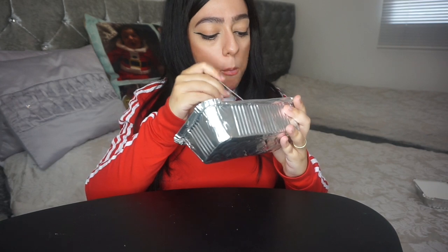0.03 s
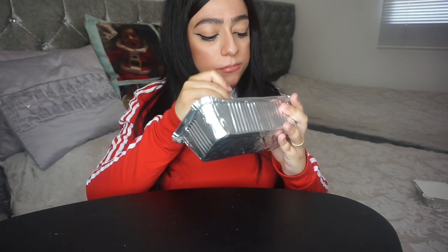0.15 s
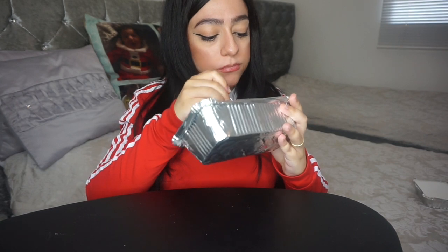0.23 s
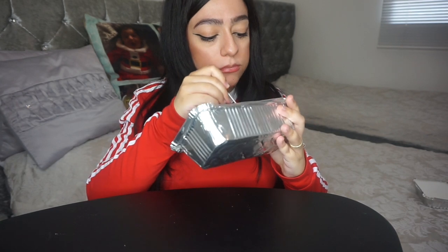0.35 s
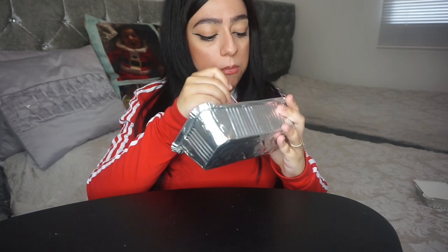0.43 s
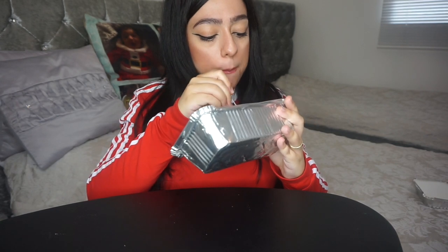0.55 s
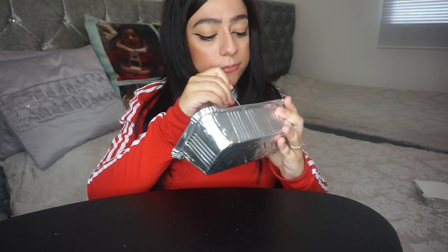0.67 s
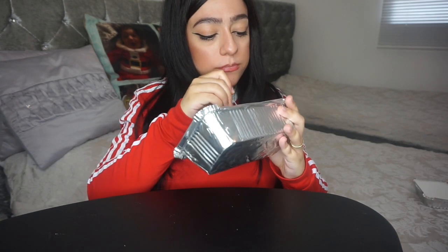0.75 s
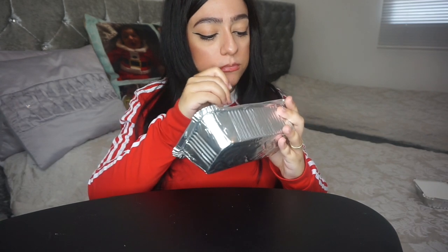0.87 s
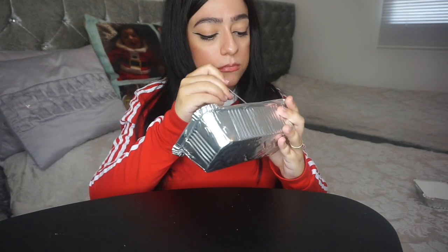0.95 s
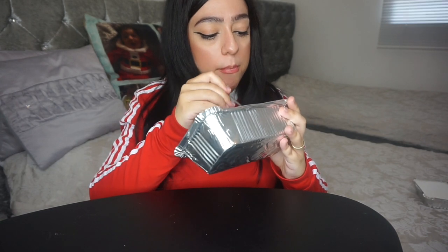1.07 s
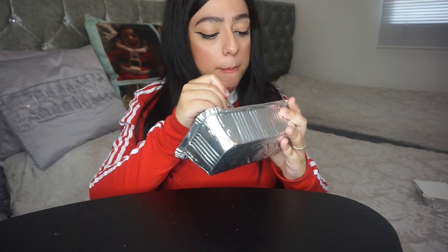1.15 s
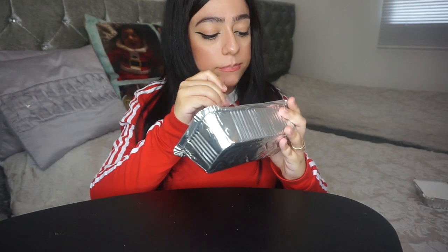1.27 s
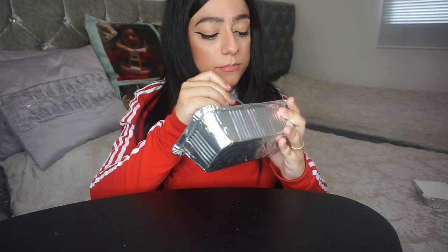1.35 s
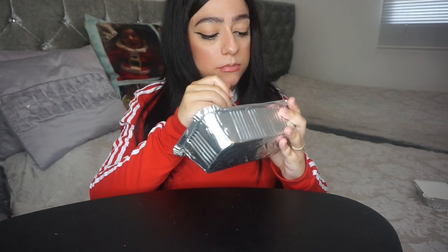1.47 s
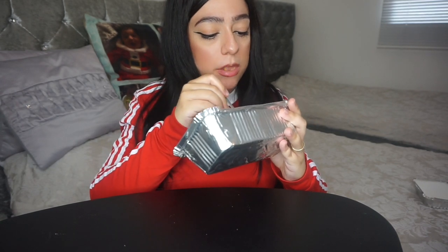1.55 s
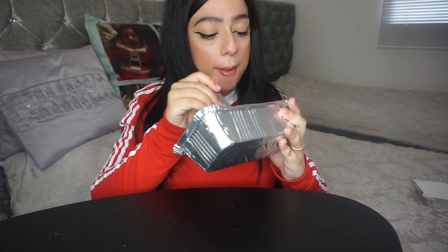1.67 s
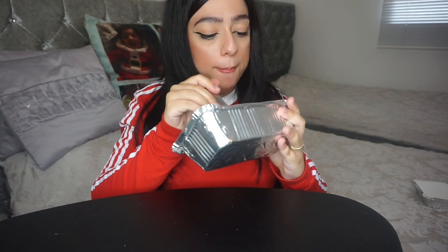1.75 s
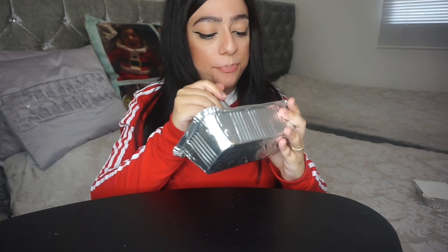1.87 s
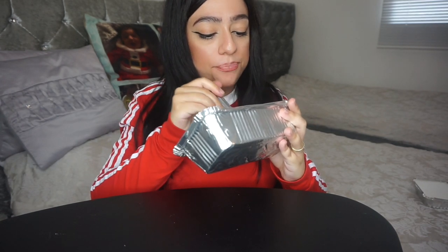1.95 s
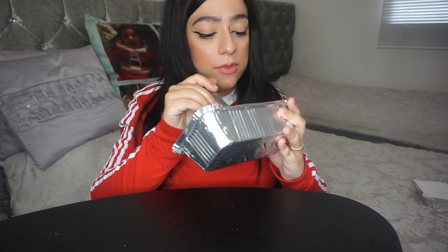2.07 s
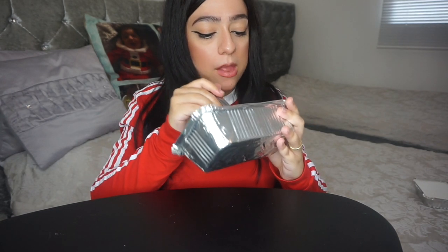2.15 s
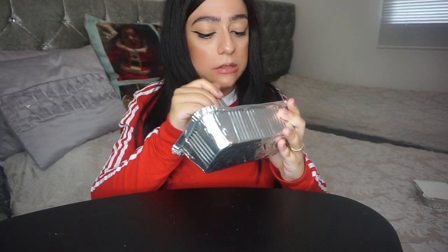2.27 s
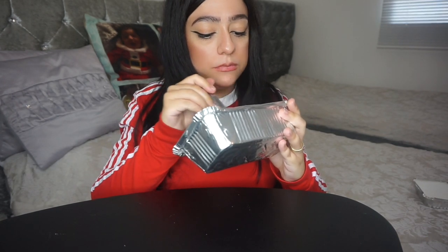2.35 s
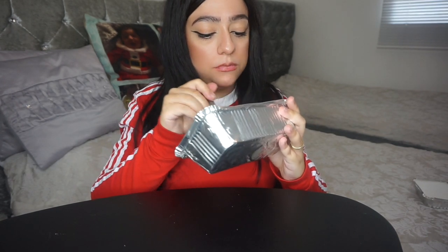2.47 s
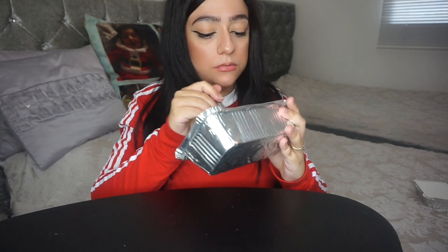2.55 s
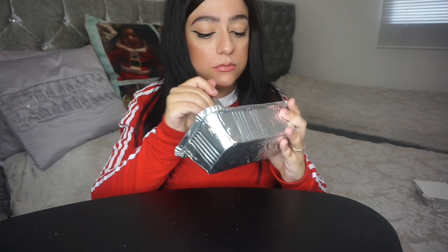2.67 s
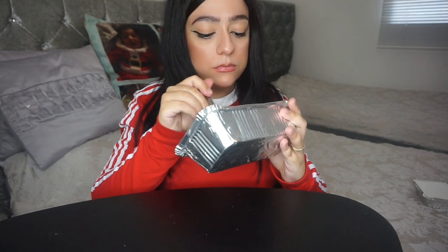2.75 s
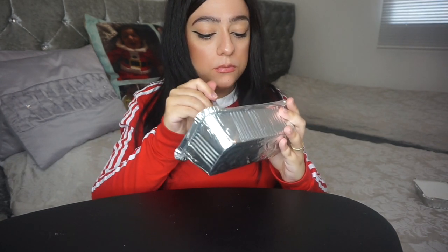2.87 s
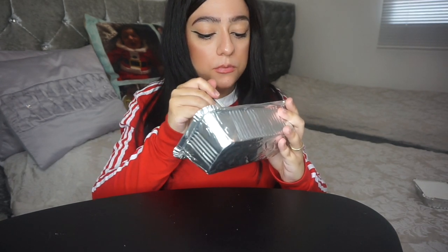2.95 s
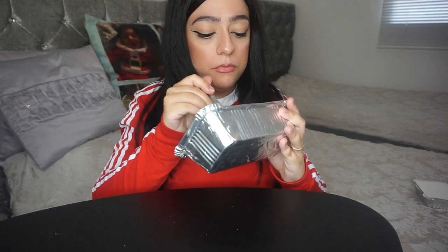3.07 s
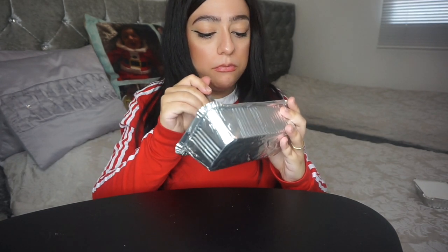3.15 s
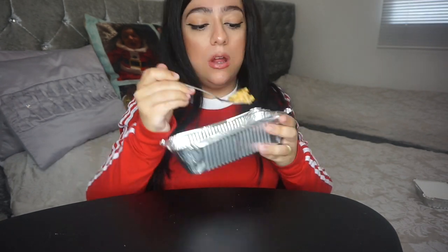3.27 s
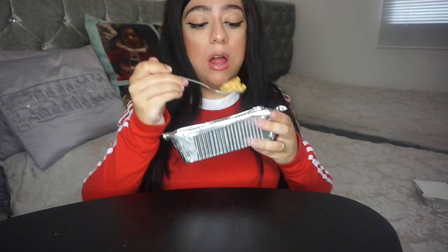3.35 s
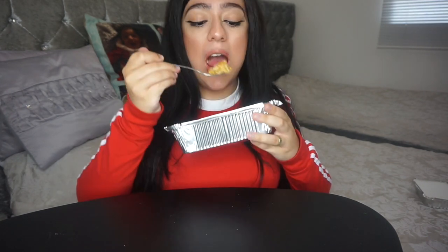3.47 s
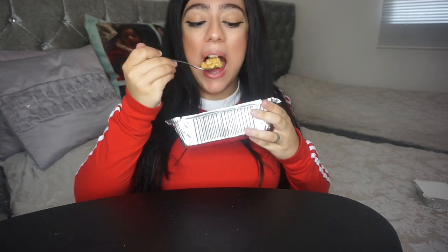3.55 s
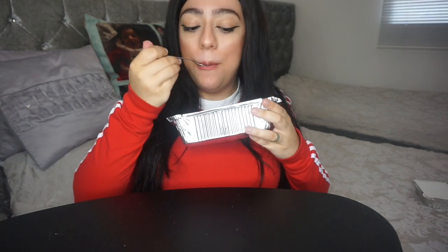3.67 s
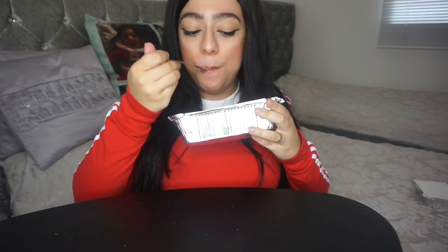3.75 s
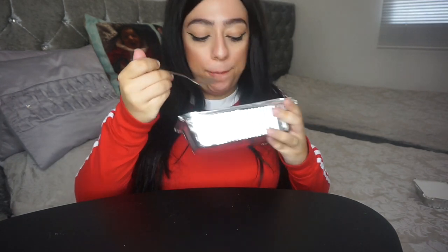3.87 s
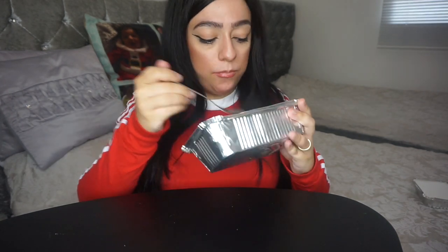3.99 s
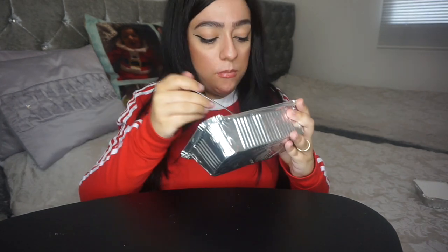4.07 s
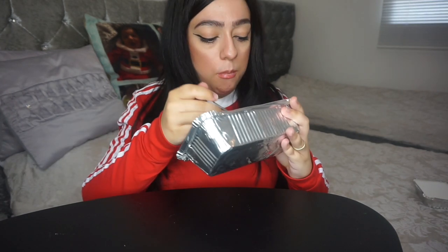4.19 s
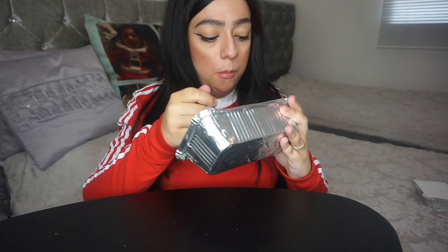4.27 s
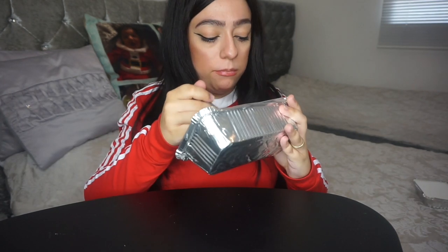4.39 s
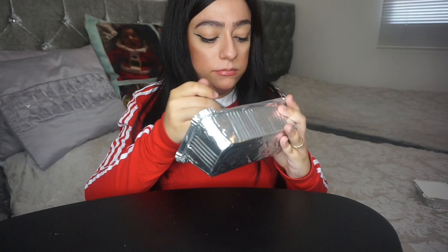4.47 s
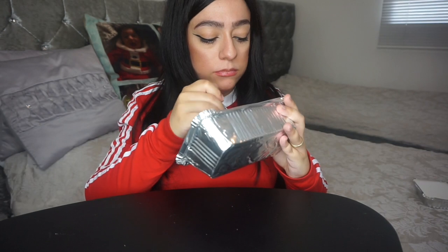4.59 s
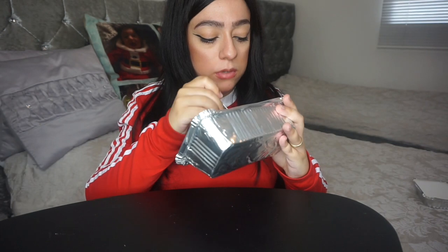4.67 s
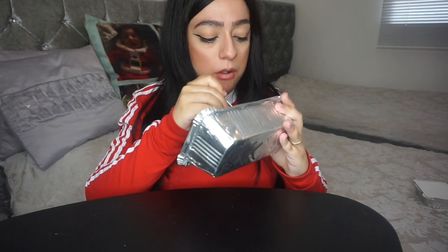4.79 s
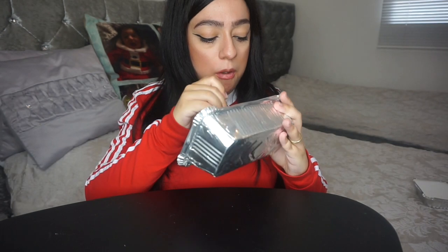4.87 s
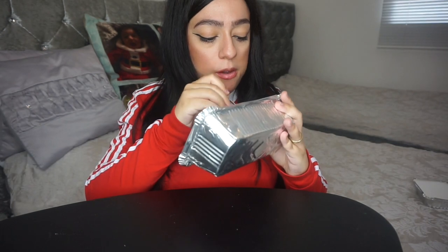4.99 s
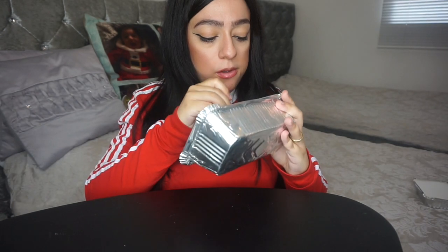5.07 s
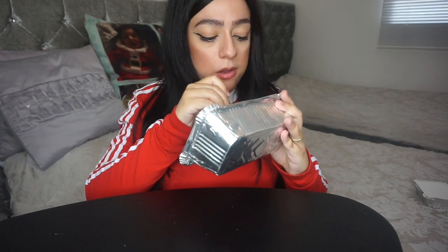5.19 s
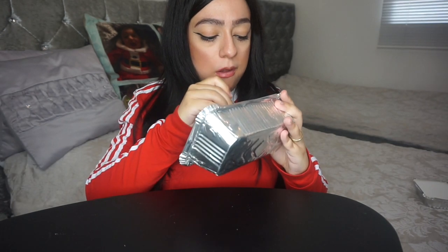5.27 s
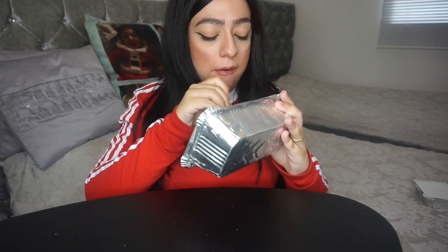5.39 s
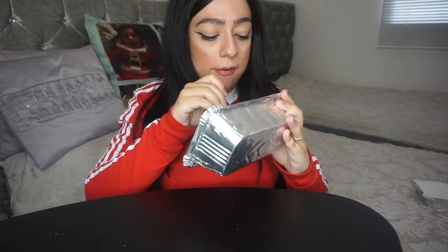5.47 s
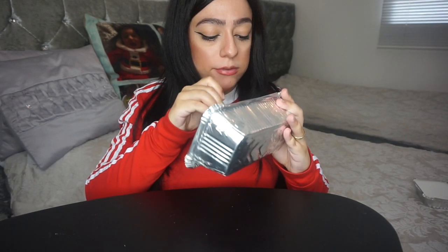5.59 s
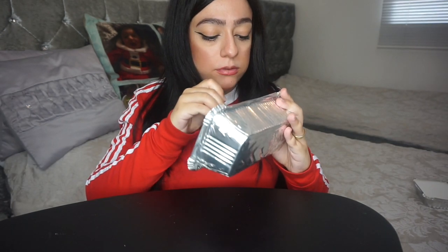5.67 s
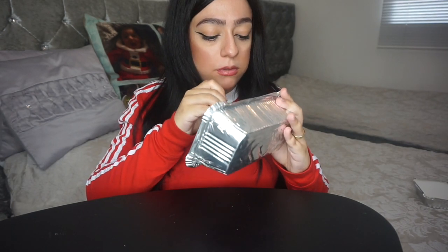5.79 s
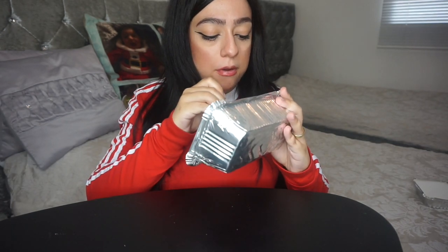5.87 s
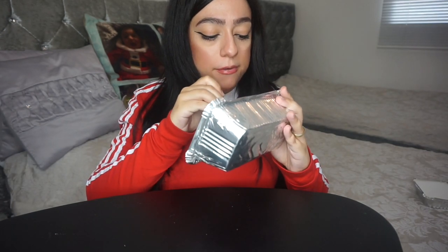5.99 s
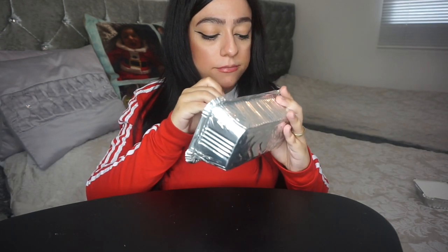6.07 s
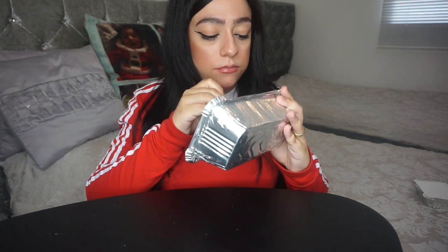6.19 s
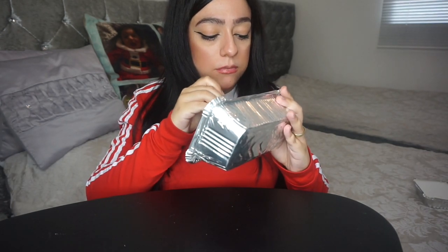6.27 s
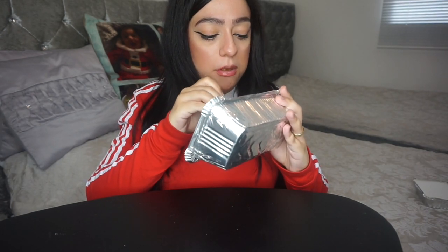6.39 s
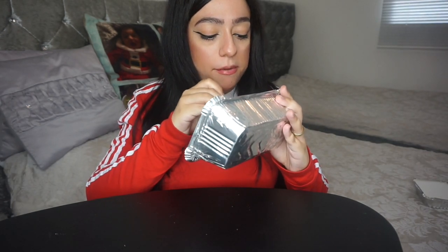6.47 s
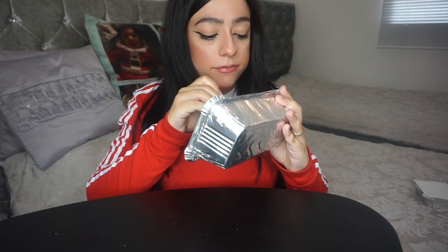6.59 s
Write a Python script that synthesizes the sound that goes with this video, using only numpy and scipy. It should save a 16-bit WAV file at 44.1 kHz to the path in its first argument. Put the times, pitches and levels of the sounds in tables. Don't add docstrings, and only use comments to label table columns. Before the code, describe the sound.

In a small, soft-furnished bedroom, a metal fork scrapes inside a ribbed foil tray close to a stereo microphone. From 0.2 s come dry rasping strokes, with a firmer snag near 0.8 s and a bright foil snap with a brief high ring at 1.2 s. A sharp crack at 1.5 s leads into a light drag and fine crackles, then scrapes at 1.9, 2.2 and 2.6 s. The loudest tinny cluster runs from 2.9 to 3.03 s, followed by a short knock at 3.4 s. Near quiet lasts until 4.3 s, apart from tiny ticks. Separate taps and short scrapes continue at roughly quarter-second intervals to 5.4 s. From 5.5 s the rim creaks faintly and a weak distant whine climbs in pitch; a strong snap lands around 5.85 s, then softer scrapes at 6.2 and 6.5 s over gentle room hush.

```python
import sys
import numpy as np
from scipy import signal
from scipy.fft import rfft, irfft
from scipy.io import wavfile

SR = 44100
rng = np.random.default_rng(int(sys.argv[2]) if len(sys.argv) > 2 else 0)


def waveform_to_disk(signal):
    frames = np.transpose(np.atleast_2d(signal))
    scaled = np.clip(frames, -1, 1) * 32767
    samples = np.round(scaled).astype(np.int16)
    wavfile.write(sys.argv[1], SR, samples)


def invert_db(x):
    u = np.asarray(x, float) / 20
    return 10 ** u


N = 292824


def at_hz(points, hz):
    points_hz, values = np.transpose(points)
    return np.interp(np.log(np.maximum(hz, 1)), np.log(points_hz), values)


def in_time(rows):
    s, *columns = np.transpose(rows)
    return [np.interp(np.arange(N) / SR, s, column) for column in columns]


def rms_one(x):
    return x / np.sqrt(np.mean(x ** 2) + 1e-20)


def drift(rate):
    knots = rng.standard_normal(2000)
    return np.interp(np.arange(N) * rate / SR, np.arange(2000), knots)


def colour(x, gain_db):
    size = 4096
    hz = np.arange(size // 2 + 1) * SR / size
    cepstrum = irfft(np.log(invert_db(gain_db(hz))))
    cepstrum[1:size // 2] *= 2
    cepstrum[size // 2 + 1:] = 0
    response = irfft(np.exp(rfft(cepstrum)))[None, :size // 2]
    return signal.oaconvolve(x, response, axes=1)[:, :N]


def ring(clicks, hz, t60):
    radius = invert_db(-60 / (t60 * SR))
    turn = 2 * np.pi * hz / SR
    return signal.lfilter([.5, 0, -.5], [1, -2 * radius * np.cos(turn), radius * radius], clicks + 1e-18)


def grains(per_s, spread_db):
    sizes = invert_db(spread_db * np.minimum(rng.exponential(1, N), 4)) * rng.choice([-1, 1], N)
    return rms_one(sizes * (rng.random(N) < per_s / SR))


def bursts(times, peak_db, fall_s):
    clicks = np.zeros(N)
    at = np.minimum((np.asarray(times) * SR).astype(int), N - 1)
    clicks[at] = invert_db(peak_db)
    return signal.lfilter([1], [1, -np.exp(-1 / (fall_s * SR))], clicks + 1e-18)


# (touch [s], drag [s], final wall drumming [dB], swell along the drag [dB],
# rasp above the drumming [dB])
STROKES = [(0.233, 0.073, -36, 4, 8.5), (.511, 0.04, -34.5, 33, 10.5), (0.772, 0.053, -25.5, 28, 8),
           (1.069, 0.0076, -26.5, -19, 5.5), (1.165, 0.094, -39.5, -8, 3.5), (1.494, 0.03, -18.5, 4, 2),
           (1.56, 0.02, -25.5, 12, -0.5), (1.62, 0.14, -49.5, 3, 5.5), (1.858, 0.093, -21, 7.5, -1),
           (2.24, 0.083, -30.5, 2, -1.5), (2.546, 0.09, -34, 12, 10.5), (2.668, 0.0059, -23.5, 5, -24),
           (2.886, 0.12, -16.5, 3.5, -2.5), (3.395, 0.042, -16.5, 9, -4.5), (4.328, 0.06, -26, 1.5, -3),
           (4.601, 0.077, -27.5, 11.5, 2), (4.882, 0.028, -21, 11, -1), (5.141, 0.026, -21, 17, -2.5),
           (5.382, 0.0063, -18, 4, -3), (5.693, 0.11, -37.5, -3, -6.5), (5.758, 0.016, -17.5, 8, -15),
           (5.831, 0.03, -22.5, 2, 0), (6.21, 0.062, -31, 3.5, -5), (6.492, 0.083, -27.5, -1.5, -3)]
ATTACK_S = 0.0036
DRUM_LIFT_DB_PER_S, RASP_LIFT_DB_PER_S, SIZZLE_LIFT_DB_PER_S = 289, 237, 248
SIZZLE_DB, SIZZLE_FOLLOWS = -12.5, 0.73
SIZZLE_DB_PER_DRAG_S = 32


def stroke_levels():
    out, t = np.zeros((3, N)), np.arange(SR // 2) / SR
    lift = np.array([[DRUM_LIFT_DB_PER_S], [RASP_LIFT_DB_PER_S], [SIZZLE_LIFT_DB_PER_S]])
    for s, drag_s, level_db, swell_db, rasp_db in STROKES:
        drag_db = level_db - swell_db * np.clip(1 - t / drag_s, 0, 1)
        sizzle_db = SIZZLE_DB + SIZZLE_FOLLOWS * rasp_db + SIZZLE_DB_PER_DRAG_S * drag_s
        layers_db = np.array([[0], [rasp_db], [sizzle_db]])
        lifted_db = lift * np.maximum(t - drag_s, 0)
        gain = invert_db(drag_db + layers_db - lifted_db) * np.minimum(t / ATTACK_S, 1)
        at = round(s * SR)
        out[:, at:at + len(t)] += gain[:, :N - at]
    return out


SNAGS = [(.2564, -20.5, 593, 2640), (.2602, -20.5, 579, 2040), (.3079, -24.5, 610, 2680),
         (.5129, -19.5, 640, 3190), (.7743, -21, 635, 3120), (.815, -12.5, 920, 3060),
         (1.0705, -19.5, 1160, 2400), (1.4449, -45, 1500, 1770), (1.5265, -21.5, 980, 2500),
         (1.6253, -39, 910, 3630), (1.9389, -34, 1050, 2960), (2.61, -17.5, 1290, 3560),
         (2.669, -10.5, 1050, 2230), (2.9611, -11.5, 850, 3150), (2.9875, -10, 1100, 3080),
         (3.029, -14.5, 980, 2780), (4.6384, -22.5, 1010, 2410), (4.8801, -18, 554, 3290),
         (5.836, -17, 1050, 2000), (6.2125, -39, 1290, 3030), (6.2415, -23, 1240, 2850),
         (6.3908, -32, 770, 1930), (6.495, -20, 1100, 3070), (6.536, -18.5, 1230, 1870)]
KNOCKS = [(.4937, -36, 403, 1980), (.558, -22, 686, 3340), (.5783, -29.5, 748, 2600),
          (.797, -40, 829, 2720), (.835, -28, 825, 3190), (.8454, -15.5, 578, 2700),
          (1.191, -19, 578, 1660), (1.959, -15.5, 1080, 2570), (2.546, -18, 369, 1770),
          (2.9718, -16, 1120, 3080), (2.998, -11.5, 1060, 2400), (3.354, -41, 231, 2170),
          (3.3988, -28, 815, 2670), (4.3295, -26.5, 806, 1780), (4.6031, -26.5, 1005, 2750),
          (4.6708, -21.5, 650, 2400), (5.1476, -31, 536, 2600), (5.174, -19.5, 1080, 2720),
          (5.3849, -20, 1250, 3780), (5.3907, -18, 1110, 3830), (5.6957, -28.5, 1170, 2390),
          (5.7605, -21.5, 554, 1720), (6.563, -21.5, 1090, 1810)]
SNAPS = [(.2333, -15.5, 576, 2700), (.3326, -32.5, 600, 2580), (1.1173, -20.5, 1180, 3200),
         (1.1734, -30, 1080, 3770), (1.232, -19.5, 1150, 3500), (1.2535, -40, 799, 4950),
         (1.495, -11, 990, 2540), (1.685, -56, 586, 4140), (1.8632, -16.5, 935, 2620),
         (2.2359, -29, 930, 3560), (2.2846, -26, 1070, 3000), (2.3127, -20.5, 1195, 2740),
         (2.8885, -14, 1320, 1830), (3.923, -43, 393, 1880), (5.8637, -11, 1100, 1830)]
# (drumming above the peak [dB], sizzle above the peak [dB])
SNAG, KNOCK, SNAP = (-12, -22.5), (-4.5, -24), (-11, -7)


def strikes():
    kinds = ((SNAGS, SNAG), (KNOCKS, KNOCK), (SNAPS, SNAP))
    rows = [(*row, *balance) for table, balance in kinds for row in table]
    return np.transpose(sorted(rows))


# (frequency [Hz], level above the rest [dB], t60 [s])
WALL = [(222, 14, 0.093), (313.8, 4, 0.11), (387, 10, 0.057), (525.5, 2.5, 0.06), (597.5, 1, 0.068),
        (750, -2.5, 0.061), (801, -2.5, 0.078), (905, 1.5, 0.04), (1005, -2.5, 0.078), (1089, 2.5, 0.039),
        (1153, -7.5, 0.11), (1234, -0.5, 0.081), (1279, 4, 0.086), (1495, 13, 0.0074)]
# (frequency [Hz], level [dB])
TRAY = [(120, -51), (220, -27), (450, -18), (540, -7.5), (700, -9.5), (1090, -6), (1450, -20), (2170, -19),
        (2970, -17), (3950, -19), (4500, -24), (6000, -33)]
# (frequency [Hz], left minus right [dB])
LEAN = [(60, 0.0), (180, -4), (550, -1), (1650, -4.5), (4970, 1.5), (15000, -5.5)]
RIB_BUMPS_PER_S, RIB_BUMP_SHARE = 170, 0.62


def tray(drum, rasp):
    s, peak_db, wall_hz, rib_hz, low_db, _ = strikes()
    latest = np.clip(np.searchsorted(s, np.arange(N) / SR + .002) - 1, 0, None)
    ribs = np.geomspace(1600, 5600, 34) * (1 + 0.002 * rng.standard_normal(34))
    lows = np.geomspace(170, 1500, 12)
    modes = [*WALL, *[(hz, -2, 14 / hz) for hz in lows], *[(hz, 0, 38 / hz) for hz in ribs]]
    grip = invert_db(3.14 * drift(58))
    snags = [grip * grains(per_s, spread_db=4.0) for per_s in (891.6, 938, 772, 832)]
    bumps = RIB_BUMP_SHARE * grains(RIB_BUMPS_PER_S, spread_db=4.5)
    wander = invert_db(3 * drift(70))
    rattle = rng.standard_normal(N)
    out = np.zeros((2, N))
    for k, (hz, own_db, t60) in enumerate(modes):
        low = hz < 1550
        near = np.exp(-(np.log(hz / (wall_hz if low else rib_hz)) / 0.095) ** 2)
        place_db = (9 if low else 12) * near + 2.02 * rng.standard_normal(len(s))
        hit_db = peak_db + (low_db - 22 if low else -20) + place_db
        blows = bursts(s, hit_db, .003 if low else .0009) * np.roll(rattle, 97 * k)
        favour = invert_db(.45 * place_db)[latest] * np.roll(wander, 7919 * k)
        rub = 0.23 * drum if low else 0.22 * rasp
        scrape = rub * (snags[k // 15] + bumps * (-1) ** (k // 4)) * favour
        force = blows + scrape * np.sqrt(hz / t60 / SR) / 10
        mode_db = at_hz(TRAY, hz) + own_db + (3 if low else 8)
        sound = ring(force, hz, t60) * invert_db(mode_db) * (-1) ** k
        lean_db = at_hz(LEAN, hz) / 2 + (1.1 if low else 1.2) * rng.standard_normal()
        lag = round(1.6 + (hz / 3300) ** 2 * rng.standard_normal())
        out[0] += invert_db(lean_db) * sound
        out[1] += invert_db(-lean_db) * np.roll(sound, lag)
    return signal.sosfilt(signal.butter(2, 150, "high", fs=SR, output="sos"), out)


# (frequency [Hz], density [dB per Hz])
SIZZLE = [(2650, -45), (4500, 1.5), (6460, -10), (9770, -10.5), (11800, -8), (13600, -7.5), (15200, -14),
          (16000, 2)]
WRINKLE_HZ = (9240, 10800, 12300, 14300)


def sizzle(level):
    s, peak_db, *_, high_db = strikes()
    near, own = rng.standard_normal(N), rng.standard_normal((2, N))
    wrinkles = sum(ring(grains(240, spread_db=3), hz, .0015) for hz in WRINKLE_HZ)
    ticks = .45 * rms_one(wrinkles)
    crack = bursts(s, peak_db + high_db + 5.5, 0.0015)
    rub = level * (0.68 * near + ticks) * invert_db(3 * drift(55))
    spread = 0.5 * own * (level + crack)
    thin = [(3000, -37.0), (4800, -17.0), (7000, -1)]
    return colour(rub + crack * near + spread, lambda hz: at_hz(SIZZLE, hz) + at_hz(thin, hz) + 5)


# (time [s], frequency [Hz], level [dB], t60 [s])
RINGS = [(1.236, 7730, -26, 0.079), (1.24, 7300, -29, 0.056), (1.238, 8200, -36, .05),
         (1.447, 1530, -48, 0.1), (1.96, 222, -36, 0.22), (2.311, 222, -35.5, 0.12),
         (2.698, 1410, -34.5, 0.33), (2.681, 341, -27, 0.077), (3.03, 327, -19, 0.061),
         (3.441, 1532, -28.5, 0.18), (4.335, 222, -34.5, 0.29), (4.678, 222, -32.5, 0.074),
         (4.9, 206, -26.5, 0.057), (2.692, 207, -37.5, 0.15), (5.178, 188, -38, 0.085),
         (5.772, 241, -34.5, 0.2), (5.88, 216, -38.5, 0.18), (6.268, 222, -42, 0.23)]


def rings():
    out, waver = np.zeros(N), np.cumsum(drift(240)) / SR
    for s, hz, level_db, t60 in RINGS:
        at = round(s * SR)
        since = np.arange(min(SR // 2, N - at)) / SR
        fade = invert_db(level_db - 60 * since / t60) * (1 - np.exp(-since / .003))
        bent = since + 0.028 * waver[at:at + len(since)]
        out[at:at + len(since)] += fade * np.sin(2 * np.pi * hz * bent)
    return out


# (time [s], peak [dB], centre [Hz])
CRACKLES = [(0.3276, -32, 12800), (1.231, -14, 7900), (1.255, -20, 6700), (1.5822, -22, 12600),
            (1.6407, -26, 10800), (1.667, -33, 12100), (1.701, -33, 10800), (1.7235, -32.5, 6900),
            (1.788, -40, 12000), (2.157, -40, 13300), (2.187, -41, 12700), (2.2364, -19.5, 14900),
            (2.2562, -29, 14200), (2.4, -37.5, 9900), (2.612, -18, 10600), (3.532, -37, 12100),
            (3.856, -36, 14200), (4.793, -47, 10200), (5.008, -45, 10000), (5.163, -35, 12500),
            (5.27, -47, 11000), (5.855, -20.5, 11400), (6.147, -48, 11900), (6.55, -40, 11000)]


def crackles():
    out, t = np.zeros(N), np.arange(256) / SR
    for s, peak_db, hz in CRACKLES:
        ping = np.sin(2 * np.pi * hz * t) * np.exp(-t / 0.00022)
        fizz = np.diff(rng.standard_normal(256), 2, prepend=[0, 0]) * np.exp(-t / 0.0013)
        at = round(s * SR)
        out[at:at + 256] += invert_db(peak_db + 5.5) * (ping + 0.15 * fizz)
    return out


# (time [s], peak [dB])
LOW_CREASE = [
    (5.5544, -51),
    (5.5915, -47),
    (5.671, -39),
    (6.0085, -44),
    (6.0632, -43),
    (6.1438, -47),
    (6.4027, -39),
]
# (time [s], peak [dB])
HIGH_CREASE = [
    (5.5104, -41),
    (5.605, -45),
    (5.6421, -42),
    (6.0463, -45),
    (6.079, -37.5),
    (6.2692, -38),
    (6.4639, -35),
]
LOW_CREASE_HZ, HIGH_CREASE_HZ, CREASE_FALL_S = 9400, 11400, .0004
CREASE_SHARE_DB = -6.5
RIM_HZ, RIM_DB = 3200, -3


def creaks():
    out, t = np.zeros(N), np.arange(256) / SR
    swell = np.exp(1 - t / CREASE_FALL_S) * t / CREASE_FALL_S
    rim = invert_db(RIM_DB) * np.sin(2 * np.pi * RIM_HZ * t)
    creases = ((LOW_CREASE, LOW_CREASE_HZ, HIGH_CREASE_HZ), (HIGH_CREASE, HIGH_CREASE_HZ, LOW_CREASE_HZ))
    for table, hz, other_hz in creases:
        other = invert_db(CREASE_SHARE_DB) * np.sin(2 * np.pi * other_hz * t)
        slip = (np.sin(2 * np.pi * hz * t) + other + rim) * swell
        for s, peak_db in table:
            at = round(s * SR)
            out[at:at + 256] += invert_db(peak_db - 3.5) * slip
    return out


# (start [s], length [s], level [dB])
CREEP = [
    (1.58, .3, -82),
    (5.5, 0.7, -85),
]
CREEP_FADE_DB_PER_S = 500


def creep():
    now, level = np.arange(N) / SR, np.zeros(N)
    for s, length, db in CREEP:
        outside_s = np.maximum(np.maximum(s - now, now - s - length), 0)
        level += invert_db(db - CREEP_FADE_DB_PER_S * outside_s)
    bands_hz = (9600, 8800, 11100, 12000, 13200, 14200)
    return sum(ring(level * grains(35, spread_db=4), hz, .0015) for hz in bands_hz)


def relaxing_foil():
    foil = crackles() + creaks() + creep()
    return np.array([foil, invert_db(5.5) * foil])


ROOM_T60_S, ROOM_CUT_HZ, ROOM_DB, ROOM_LIKENESS = 0.32, 11500, -15, 0.25


def room(x):
    t = np.arange(SR // 2) / SR
    echoes = rng.standard_normal((2, len(t))) * np.clip((t - .004) / 0.0022, 0, 1)
    dull = signal.sosfilt(signal.butter(1, min(ROOM_CUT_HZ, .4 * SR), fs=SR, output="sos"), echoes)
    bright = echoes - dull
    tail = dull * invert_db(-60 * t / ROOM_T60_S) + bright * invert_db(-60 * t / (.8 * ROOM_T60_S))
    tail = tail + ROOM_LIKENESS * tail[::-1]
    return signal.fftconvolve(x.mean(axis=0)[None], tail / 10, axes=1)[:, :N]


WHINE_S, WHINE_HZ, WHINE_CLIMB_HZ_PER_S, WHINE_DB, WHINE_SWELL_S = 5.45, 691, 66, -52.5, 0.23


def whine():
    since = np.maximum(np.arange(N) / SR - WHINE_S, 0)
    hz = WHINE_HZ + WHINE_CLIMB_HZ_PER_S * since + 6 * drift(40)
    level = invert_db(WHINE_DB + 1.7 * drift(16)) * np.minimum(since / WHINE_SWELL_S, 1)
    return level * np.sin(2 * np.pi * np.cumsum(hz) / SR)


# (frequency [Hz], density [dB per Hz])
HUSH = [(15, -39.5), (25, -16.5), (114, -6.5), (145, -8), (309, -3), (394, -2.5), (427, -2), (2160, -11.5),
        (5430, -21.5), (14800, -26.5), (16000, -11)]
# (time [s], level [dB])
HUSH_DB = [
    (0, -48.5),
    (.2, -49.5),
    (1.5, -48.5),
    (3.5, -47),
    (3.9, -51.5),
    (4.3, -51),
    (5.5, -45),
    (6.64, -49.5),
]
# (frequency [Hz], left-right likeness [0-1])
LIKENESS = [(40, 1), (150, 0.73), (400, 0.083), (1200, 0.012), (5000, 0.033), (15000, 0.67)]


def hush():
    mid, side = rng.standard_normal((2, 1, N))
    alike = lambda hz: np.clip(at_hz(LIKENESS, hz), 0, .98)
    shared = colour(mid, lambda hz: at_hz(HUSH, hz) + 10 * np.log10(1 + alike(hz)))
    apart = colour(side, lambda hz: at_hz(HUSH, hz) + 10 * np.log10(1 - alike(hz)))
    level = invert_db(in_time(HUSH_DB)[0] - 0.5 + 0.13 * drift(9.7))
    return level * rms_one(shared + apart * [[1], [-1]])


def scene():
    drum, rasp, bright = stroke_levels()
    near = tray(drum, rasp) + sizzle(bright) + relaxing_foil() + rings()
    return near + invert_db(ROOM_DB) * room(near) + whine() + hush()


def roll_off(x):
    return signal.sosfilt(signal.butter(12, 16810, fs=SR, output="sos"), x)


def record(dry):
    cut = signal.sosfilt(signal.cheby2(10, 40, 16250, fs=SR, output="sos"), dry)
    return roll_off(cut)


dry = scene()
out = record(dry)
waveform_to_disk(out)
```